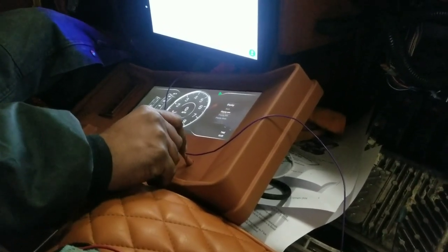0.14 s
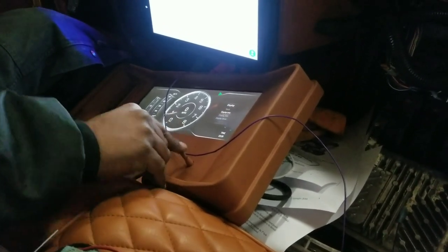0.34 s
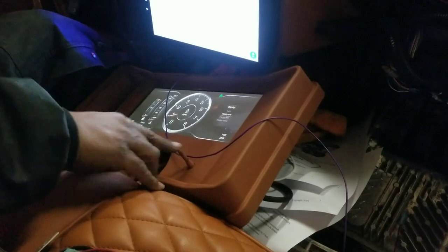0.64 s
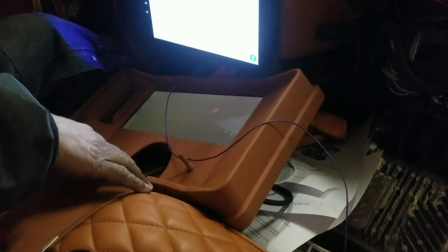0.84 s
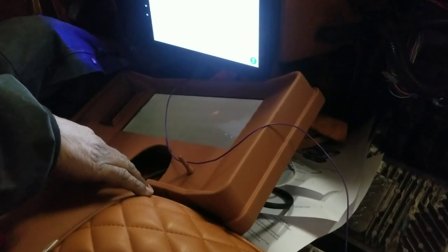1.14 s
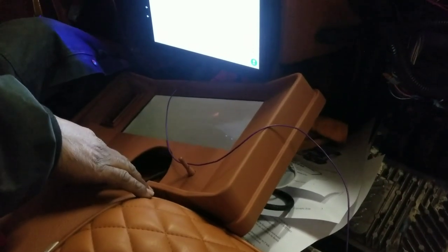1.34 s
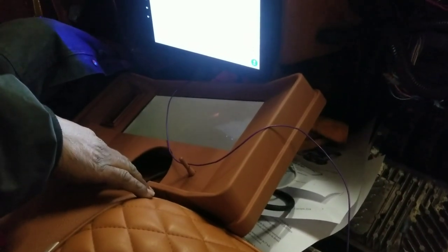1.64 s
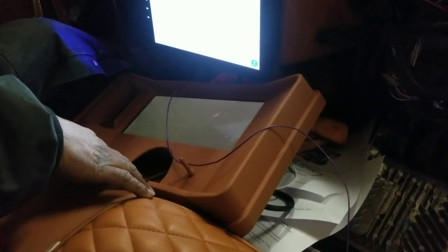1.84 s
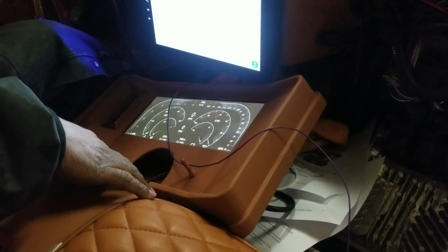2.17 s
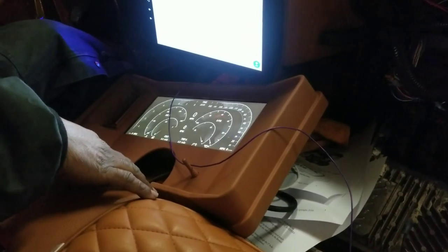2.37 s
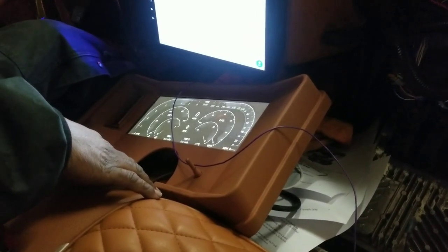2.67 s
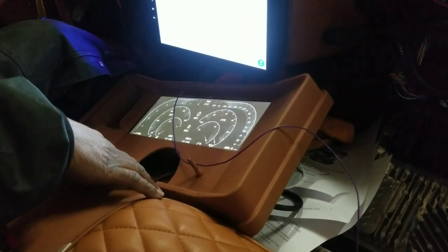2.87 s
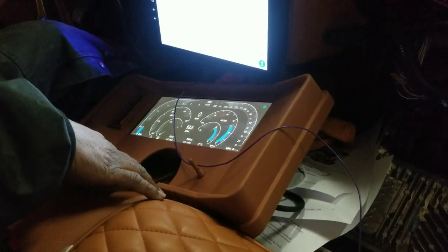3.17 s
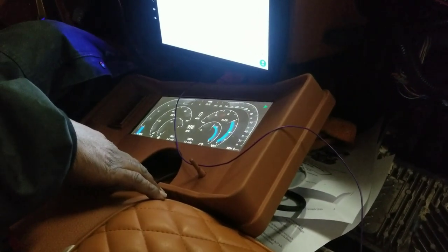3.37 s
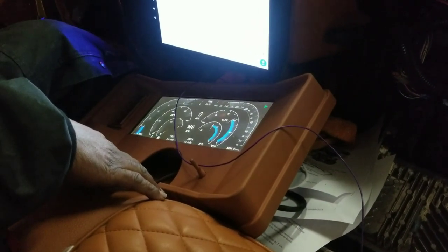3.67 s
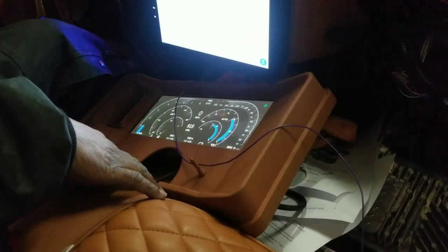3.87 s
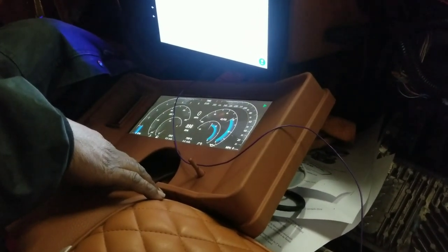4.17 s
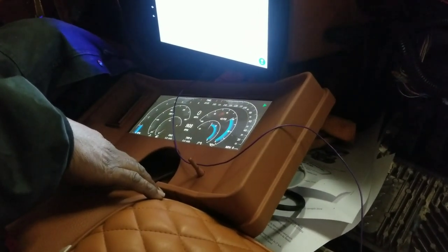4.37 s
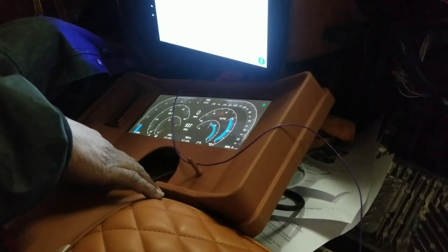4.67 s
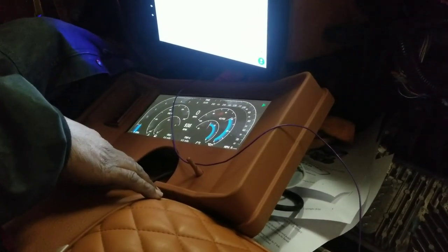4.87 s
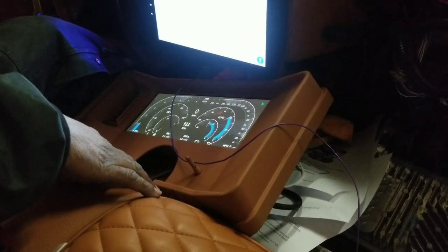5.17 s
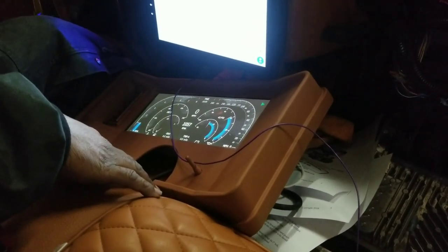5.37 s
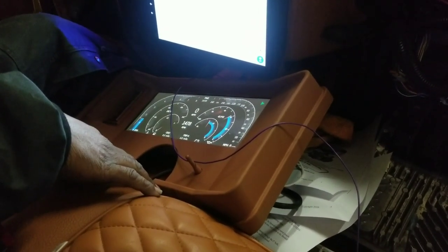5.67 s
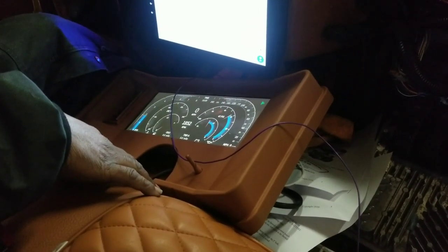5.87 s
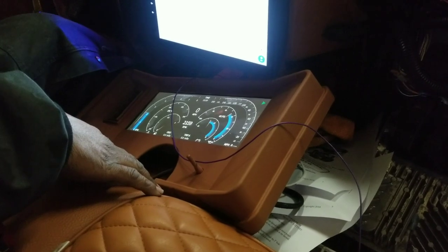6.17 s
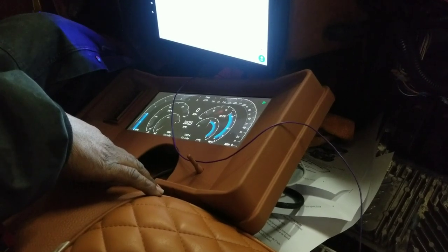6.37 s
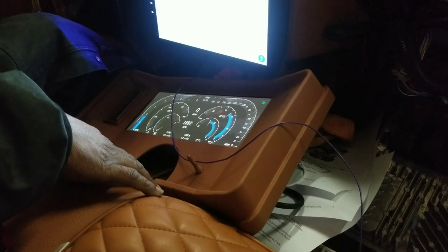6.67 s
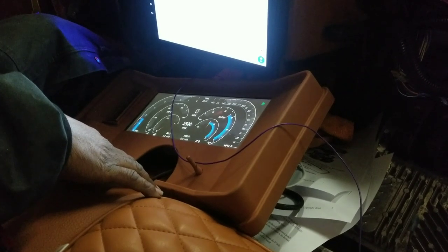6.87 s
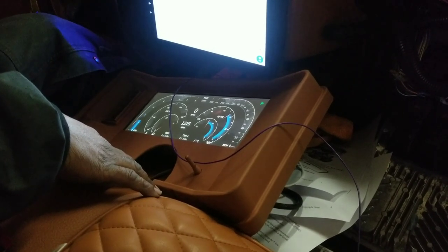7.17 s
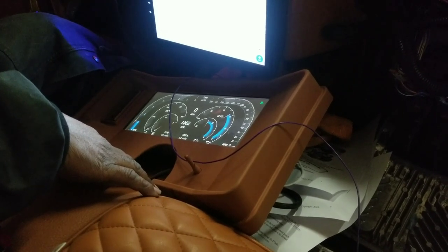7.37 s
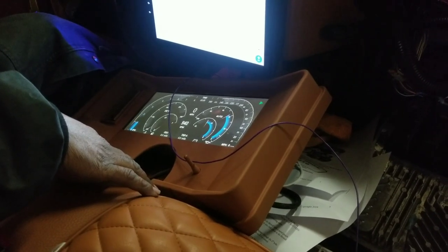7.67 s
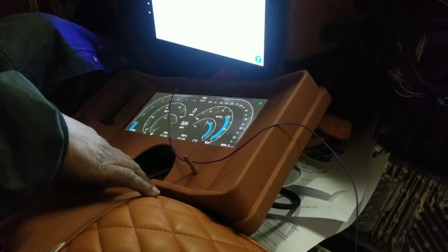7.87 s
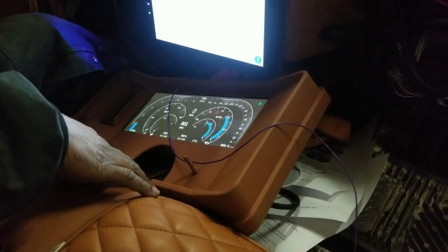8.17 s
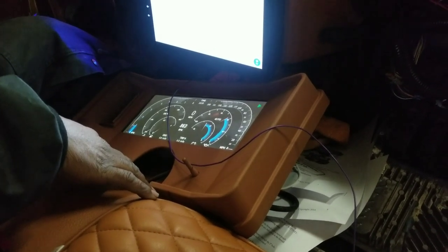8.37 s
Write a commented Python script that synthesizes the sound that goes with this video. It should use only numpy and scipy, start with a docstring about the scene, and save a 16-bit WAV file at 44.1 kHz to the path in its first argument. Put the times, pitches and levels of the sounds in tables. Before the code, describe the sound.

Low, lumpy engine idle throbs in a workshop; a quick throttle stab roars and buzzes loose metal before the revs sink into slow, weak thuds.

```python
"""The deep boom of an eight-cylinder engine idling in a workshop; it is blipped once and sags below idle.
The firings of two uneven banks make harmonics of the engine cycle, shaped by exhaust resonances, and a hum wavers.
Each firing knocks on ringing modes, the hardest also whoops; filtered noise gives the rustle of the valve gear
and the hiss of the intake, strongest on open throttle. A sleeve brushes past in the same hiss; later a loose
shield buzzes as random taps ring its sheet, and near the end a faint pure tone squeaks."""
import sys
import numpy as np
from scipy import signal
from scipy.fft import rfft, irfft, next_fast_len
from scipy.io import wavfile
from scipy.ndimage import uniform_filter1d, minimum_filter1d

SR = 44100
rng = np.random.default_rng(int(sys.argv[2]) if len(sys.argv) > 2 else 0)


def wav_record(signal):
    """Record a signal, one row per channel, as 16-bit PCM in the file named by sys.argv[1]."""
    frames = np.transpose(np.atleast_2d(signal))
    bounded = np.clip(frames, -1, 1)
    # unit amplitude maps onto the largest positive 16-bit level
    quanta = np.round(bounded * 32767).astype(np.int16)
    wavfile.write(sys.argv[1], SR, quanta)


N = 375732  # samples

# Engine speed. Each row: time in seconds, engine cycles per second (one cycle is eight firings).
SPEED = [(0.0, 9.017), (1.2, 8.904), (1.9, 9.03), (2.5, 8.958), (3.2, 8.764), (3.9, 8.865), (4.95, 8.882),
         (5.04, 9.683), (5.16, 12.894), (5.4, 18.119), (5.55, 22.539), (5.76, 23.108), (6.05, 19.579),
         (6.2, 19.101), (6.4, 16.005), (6.56, 14.9), (6.7, 12.5), (6.87, 11.7), (7.0, 10.4), (7.3, 9.005),
         (7.75, 7.876), (8.52, 6.771)]
IDLE_HZ, FIRST_TURN = 8.95, .105  # cycle rate at idle; part of a cycle already run at the start
# Engine load. Each row: time in seconds, manifold knock in dB, treble in dB over idle, weaker orders in dB.
LOAD = [(0, -26, 2, -16.5), (1, -27, 0.34, -16.5), (2.7, -28, -0.05, -17.5), (4.8, -26.5, 0.4, -18),
        (5.05, -23, 3.4, -12.5), (5.2, -24, 4.5, -18), (5.5, -21, 5.5, -16), (5.67, -17, 9.5, -22),
        (5.8, -27, 2.5, -28), (5.98, -17, 1, -11.5), (6.25, -25, -2, -18), (6.5, -23, -4, -13),
        (6.62, -32, -4, -19.5), (7.05, -43.5, -6.5, -38), (7.5, -38.5, -5.5, -31), (7.75, -37, -5, -23),
        (8.0, -37, -3.5, -29.5), (8.28, -34, -1, -28), (8.42, -32.5, -2.5, -18), (8.52, -34, -1, -21)]
# Push of the exhaust. Each row: time in seconds, level in dB over idle.
PUSH = [(0, 0), (1, -1.5), (2.7, -2), (4.85, -2.5), (5.05, 6), (5.2, 0), (5.45, 8), (5.67, 11), (5.8, 6),
        (5.98, 4), (6.3, 0), (6.5, 2.5), (6.62, -14), (6.72, 1), (6.86, 1), (6.98, -11), (7.5, -10.5),
        (8.0, -.5), (8.25, -2.5), (8.52, -.5)]
# Throttle stabs. Each row: opens at s, starts to shut at s, depth 0-1.
THROTTLE = [(4.967, 5.106, 1), (5.15, 5.613, 0.84)]
OPENING_S, SHUTTING_S = 0.03, .11

# Which of the two pipes each of the eight firings leaves by (0 or 1).
BANK = np.array([1, 0, 1, 1, 0, 1, 0, 0])
# Relative strength of the knock of each of the eight firings in dB.
CYLINDER_DB = [0.5, -1, -6.5, -1, -13, -0.5, -5.5, -5]
# Strong clean orders. Each row: multiple of the cycle rate, dB at idle, dB more per octave of speed,
# dB more on open throttle.
STRONG_ORDERS = [(3, -20, -12.3, -19), (4, -32, -6, -2), (5, -39.5, 5, -0.5), (8, -26, -9.5, 6),
                 (9, -50, 19, -9.5), (11, -33.5, 11, 2), (13, -32.5, 11.5, 4.5)]
# Weaker orders. Each row: multiple of the cycle rate, relative level at idle in dB.
WEAK_ORDERS = [(6, -12), (7, -17.5), (10, -10.5), (12, -19), (14, -8), (15, -4.5), (16, -2.5), (17, -10),
               (18, -29.5), (19, -4.5), (20, -26), (21, 3.5), (22, -50), (23, -43), (24, -7.5), (25, -22.5),
               (26, -13)]
SMEAR = .37  # the pipes spread each pulse in time: radians per order squared
# How well the tailpipe carries a strong order. Each row: frequency in Hz, gain in dB.
PIPE = [(25, -31.5), (45, -3.5), (55, 12.5), (63, 0), (72, 8.4), (86, 5.7), (96, 14), (106, 12), (115, 12),
        (128, 7.6), (143, 8), (160, .5), (180, 9), (200, -8), (300, -32)]
# Exhaust and cabin resonances. Each row: frequency in Hz, width in Hz, relative level in dB.
BOOM = [(58.4, 4.6, -5.5), (105.4, 6.9, -4), (119.3, 5.4, -12.5), (131, 5.1, 1), (141.4, 21, -2.5),
        (179.2, 15.7, -3.5), (184.7, 7.5, 1.5), (226, 10.4, -8)]
# A control rule holds: dB at idle, share of the control, dB more on open throttle, dB per octave of speed.
# Rule for the uneven firings; the control is the push.
UNEVEN_RULE = (-23.5, .45, 6.5, -2)
# Narrow wavering hum. Each row: time in seconds, frequency in Hz, level in dB rms.
DRONE = [(0, 135.3, -16), (2.6, 135.3, -27), (3.1, 132.5, -16.5), (3.6, 133.1, -21), (4.7, 132.5, -22.5),
         (5.1, 129.8, -13.5), (5.6, 129.6, -20), (6.2, 129.6, -20.5), (6.5, 131, -62), (6.9, 130.8, -25),
         (7.3, 129.6, -25), (7.55, 126.3, -46), (8.0, 129, -17.5), (8.25, 130.1, -38), (8.52, 135.2, -14)]
# Modes of manifold and floor pan. Each row: frequency in Hz, relative level in dB, t60 in seconds.
PAN = [(222, -1.5, 0.061), (276.1, 1.5, 0.16), (288.5, 0, 0.083), (360.6, -2.5, 0.21), (414.2, -3.5, 0.12),
       (441.2, -7, 0.3), (494.3, -4.5, 0.23), (557.7, -3, 0.14), (728.5, -21, 0.15), (836.7, -18, 0.16),
       (920, -14, 0.1), (1100, -27, 0.029)]
# Whoop of the hardest firing in the header. Each row: time in seconds, strength of the blow in dB.
WHOOP = [(0, -7.5), (2.4, -8.5), (3.2, -10.5), (4.8, -11.5), (5.0, -17), (5.3, -36), (7.6, -41), (8.5, -30)]

# Spectrum of the valve gear. Each row: frequency in Hz, relative density in dB per Hz.
GEAR = [(120, -45), (200, -17), (216, -35), (281, -14), (318, -10.5), (446, -13.5), (571, -15), (627, -20),
        (908, -22), (1360, -24.5), (4120, -30), (6650, -39.5), (8000, -103), (10400, -91), (17600, -120)]
# Spectrum of intake and sleeve. Each row: frequency in Hz, relative density in dB per Hz.
HISS = [(2350, -9.5), (4000, -3), (4970, -4), (6630, 3), (7870, -6), (8440, -8.5), (9630, -3), (13600, 0.5),
        (15100, 3.5), (15800, -44.5)]
# Control rule for the valve gear; the control is the treble level.
GEAR_RULE = (-33, 1.12, 0.2, -0.1)
# Control rule for the intake; the control is the treble level.
INTAKE_RULE = (-48.5, 0.92, 11.5, 0.7)
# Left-right likeness of the noise. Each row: frequency in Hz, correlation from -1 to 1.
SAME = [(60, 0.98), (130, -0.067), (290, 0.91), (640, 0.27), (1410, -0.34), (3100, 0.074), (6820, -0.091),
        (15000, 0.036)]
# A sleeve brushes past. Each row: loudest at s, level in dB, rise in seconds, fall in seconds.
RUSTLE = [(.4, -56, .03, .04), (.7, -52, .04, 0.091)]
# Bursts of a loose heat shield. Each row: loudest at s, level in dB, rise in seconds, fall in seconds.
RATTLE = [(5.214, -25.5, 0.045, 0.028), (5.32, -32, .04, .05), (5.46, -26, 0.066, 0.082),
          (5.65, -13.5, 0.046, 0.048), (5.92, -28, 0.073, 0.17), (6.09, -36, 0.06, 0.048),
          (6.22, -41, 0.0089, 0.014), (6.4, -39, 0.048, .04), (6.52, -28, 0.008, 0.033)]
# Resonances of the shield. Each row: frequency in Hz, width in Hz, relative level in dB.
SHIELD = [(744, 64, 6.5), (900, 170, 9), (1115, 24, 9), (1630, 310, 0), (2000, 61, 1), (2320, 58, -3),
          (2930, 120, -16), (3510, 250, -32)]
SHIELD_REST_DB = -54  # between bursts
# A faint squeak. Each row: loudest at s, level in dB rms, rise in seconds, fall in seconds.
SQUEAK = [(8.39, -49, .07, .035)]
SQUEAK_HZ = 2040

BOOM_LAG, KNOCK_LAG = 20, 12  # samples by which the left port hears late
# Balance of the ports. Each row: frequency in Hz, left over right in dB.
BALANCE_DB = [(60, 2), (250, 2), (600, 2), (1300, 0.6), (2400, -4), (4400, -1.5), (9000, 0.3)]
CEILING, EDGE_HZ = .95, 15800  # limiter ceiling (full scale is 1); upper band edge


def gain_of(db):
    """Decibel law: 20 dB is a tenfold amplitude."""
    return 10 ** (np.asarray(db) / 20)


def evened(x):
    """Normalisation to an rms of 1."""
    return x / np.sqrt(np.mean(x ** 2) + 1e-20)


def read(points, hz):
    """Interpolation of a table along logarithmic frequency."""
    f, value = np.transpose(points)
    return np.interp(np.log(hz + 1), np.log(f + 1), value)


def curve(rows, column):
    """Linear interpolation of one table column over time."""
    rows = np.array(rows)
    return np.interp(np.arange(N) / SR, rows[:, 0], rows[:, column])


def drift(seconds, count):
    """Slow random modulation: straight lines between normal random knots, a set time apart."""
    knots = rng.standard_normal((count, 400))
    knot_time = np.arange(N) / SR / seconds
    return np.array([np.interp(knot_time, np.arange(400), k) for k in knots])


def filtered(x, response):
    """Linear filtering: the spectrum is multiplied by a frequency response."""
    size = next_fast_len(N + SR)
    hz = np.fft.rfftfreq(size, 1 / SR)
    return irfft(rfft(x, size) * response(hz), size)[..., :N]


def resonances(rows, hz):
    """Superposition of damped resonances, each a complex peak of given width."""
    return sum(gain_of(db) / (1 + 2j * (hz - f) / width) for f, width, db in rows)


def bursts(rows):
    """Exponential growth to a peak and exponential decay after it, as a gain."""
    t = np.arange(N) / SR
    return sum(gain_of(db) * np.exp(-np.maximum((s - t) / rise, (t - s) / fall)) for s, db, rise, fall in rows)


def throttle():
    """Valve opening 0-1: each stab ramps open and ramps shut."""
    t = np.arange(N) / SR
    return np.maximum(*[np.interp(t, [a, a + OPENING_S, b, b + SHUTTING_S], [0, depth, depth, 0])
                        for a, b, depth in THROTTLE])


def follow(rule, control_db):
    """Level in dB as a sum of the effects of control, throttle and speed."""
    idle_db, share, open_db, slope_db = rule
    octaves = np.log2(curve(SPEED, 1) / IDLE_HZ)
    return idle_db + share * control_db + open_db * throttle() + slope_db * octaves


def firings(turns):
    """Eight equal divisions of the cycle: sample and cylinder of every firing."""
    count = np.floor(8 * turns)
    at = np.flatnonzero(np.diff(count)) + 1
    return at, count[at].astype(int) % 8


def boom(hz):
    """Exhaust resonances within a band: little passes far below or above them."""
    return resonances(BOOM, hz) / (1 + (44 / (hz + 1e-9)) ** 4) / (1 + (hz / 400) ** 2)


def pipe(hz):
    """Minimum-phase response of the tailpipe: its peaks ring on after an order has passed through them."""
    log_gain = np.log(gain_of(read(PIPE, hz)))
    circle = signal.hilbert(np.r_[log_gain, log_gain[-2:0:-1]])
    return np.exp(np.conj(circle[:len(hz)]))


def order_tone(k, turns, chance):
    """Fourier harmonic of the cycle, its phase set by the uneven firing of the banks."""
    phases = np.angle(np.fft.fft(BANK + 0.21 * gain_of(CYLINDER_DB)))
    return np.cos(2 * np.pi * k * turns + phases[k % 8] + SMEAR * k * k + chance)


def exhaust(turns):
    """Harmonics through resonances: strong orders follow the push, weak ones their own level."""
    push_db = curve(PUSH, 1)
    strong = np.zeros(N)
    for (k, db, slope_db, open_db), chance in zip(STRONG_ORDERS, drift(0.22, count=len(STRONG_ORDERS))):
        level_db = follow((db, 1, open_db, slope_db), push_db)
        strong += np.sqrt(2) * gain_of(level_db) * order_tone(round(k), turns, 0.3 * chance)
    weak = np.zeros(N)
    for (k, db), chance in zip(WEAK_ORDERS, drift(.15, count=len(WEAK_ORDERS))):
        idle_response = abs(boom(max(k * IDLE_HZ, 60)))  # divided out, so the table holds at idle
        weak += gain_of(db + 1.0 * chance) / idle_response * order_tone(round(k), turns, 0.37 * chance)
    weak = filtered(weak, boom)
    weak /= np.std(weak[:4 * SR])  # the first four seconds, at idle, set the reference
    return filtered(strong, pipe) + weak * gain_of(curve(LOAD, 3))


def rumble(turns):
    """Impulse excitation: no two firings burn alike, and the differences ring the boom resonances."""
    at, _ = firings(turns)
    kicks = np.zeros(N)
    kicks[at] = rng.uniform(-1.2, 1, len(at))
    return evened(filtered(kicks, boom)) * gain_of(follow(UNEVEN_RULE, curve(PUSH, 1)))


def drone():
    """Frequency modulation: a narrow hum wavers about a pitch independent of engine speed."""
    wavering_hz = curve(DRONE, 1) + 1.43 * drift(0.048, count=1)[0]
    cycles = np.cumsum(wavering_hz) / SR
    return np.sqrt(2) * gain_of(curve(DRONE, 2)) * np.sin(2 * np.pi * cycles)


def knock(turns):
    """Modal ringing: each firing strikes the manifold, more raggedly the faster the engine runs."""
    at, cylinder = firings(turns)
    timing_luck, size_luck = rng.standard_normal((2, len(at)))
    ragged = (curve(SPEED, 1)[at] / IDLE_HZ) ** 1.43
    blows = np.zeros(N + 400)
    # a lead-in of 200 samples, cut off below, lets blows come early as well as late
    shift = np.clip(200 + 12 * ragged * timing_luck, 0, 399).astype(int)
    size_db = np.array(CYLINDER_DB)[cylinder] + 1.53 * ragged * size_luck
    blows[at + shift] = gain_of(size_db) * (2 * BANK[cylinder] - 1)  # the banks push in opposite senses
    t = np.arange(SR // 4) / SR
    ring = sum(gain_of(db - 60 * t / t60) * np.sin(2 * np.pi * hz * t) for hz, db, t60 in PAN)
    soft_onset = 1 - np.exp(-t / 0.0038)
    out = signal.oaconvolve(blows[200:], ring * soft_onset)[:N]
    running_rms = np.sqrt(uniform_filter1d(out ** 2, SR // 2) + 1e-12)
    return out / running_rms * gain_of(curve(LOAD, 1))


def whoop(turns):
    """Gliding resonance: once a cycle a short tone rises in pitch over a duller thud."""
    at, cylinder = firings(turns)
    at = at[cylinder == 0]
    blows = np.zeros(N)
    blows[at] = gain_of(curve(WHOOP, 1)[at] + 1.0 * rng.standard_normal(len(at)))
    t = np.arange(SR // 10) / SR
    rise_hz = 520 - 170 * np.exp(-t / .014)
    tone = np.sin(2 * np.pi * np.cumsum(rise_hz) / SR) * (1 - np.exp(-t / .004)) * gain_of(-60 * t / .075)
    thud = gain_of(-5.5 - 60 * t / 0.08) * np.sin(2 * np.pi * 335 * t) * (1 - np.exp(-t / 0.0057))
    return signal.oaconvolve(blows, tone + thud)[:N]


def noise(spectrum, level_db, patchy_db, flicker_db):
    """Partly coherent stereo noise, with drifting patches and a flicker shared by all pitches."""
    level_db = level_db[::128]  # one value per frame
    frames, hz = len(level_db), np.fft.rfftfreq(512, 1 / SR)
    a, b, c, d, patches = rng.standard_normal((frames, 257, 5)).T
    patches = evened(uniform_filter1d(uniform_filter1d(patches, 8, 0), 20, 1))
    flicker = evened(uniform_filter1d(rng.standard_normal(frames), 5))
    same = np.clip(read(SAME, hz), -1, 1)[:, None]
    left, other = a + 1j * b, c + 1j * d
    z = np.array([left, same * left + np.sqrt(1 - same ** 2) * other])
    z *= gain_of(read(spectrum, hz)[:, None] + patchy_db * patches + flicker_db * flicker)
    scale = np.std(signal.istft(z, nperseg=512, noverlap=384)[1])
    out = signal.istft(z * gain_of(level_db), nperseg=512, noverlap=384)[1] / scale
    return np.pad(out, ((0, 0), (0, 512)))[:, :N]


def valve_gear():
    """Broadband friction noise: the rustle follows the treble level and the speed."""
    return noise(GEAR, follow(GEAR_RULE, curve(LOAD, 2)), patchy_db=1.0, flicker_db=0.44)


def intake_and_sleeve():
    """Turbulent noise: the intake hisses with open throttle, and the brushing sleeve hisses alike."""
    level = gain_of(follow(INTAKE_RULE, curve(LOAD, 2))) + bursts(RUSTLE)
    return noise(HISS, 20 * np.log10(level), patchy_db=.8, flicker_db=.25)


def shop(x, t60=0.24):
    """Reverberation: sparse echoes of random sign, other ones for each side."""
    taps = np.zeros((2, SR // 2))
    slots = np.arange(200, SR // 2 - 20, 20)
    at = slots + rng.integers(0, 20, (2, len(slots)))
    np.put_along_axis(taps, at, rng.choice([-1., 1.], at.shape), 1)
    taps *= gain_of(-60 * np.arange(SR // 2) / SR / t60)
    return signal.fftconvolve(x[None], taps / np.linalg.norm(taps[0]), axes=1)[:, :N]


def shield():
    """Plate resonance: dense random taps ring the thin sheet, other taps for each side."""
    taps = rng.standard_normal((2, N)) * (rng.random((2, N)) < 1500 / SR)  # 1500 a second on average
    ring = filtered(taps, lambda hz: resonances(SHIELD, hz) / (1 + (hz / 5000) ** 4))
    return evened(ring) * (gain_of(SHIELD_REST_DB) + bursts(RATTLE))


def squeak():
    """Pure tone: a thin sine of steady pitch swells and dies."""
    return np.sqrt(2) * bursts(SQUEAK) * np.sin(2 * np.pi * SQUEAK_HZ * np.arange(N) / SR)


def late(x, count):
    """Propagation delay by a number of samples."""
    return np.pad(x, (count, 0))[:N]


def scene():
    """Superposition of all sources, with the engine heard late at the left port."""
    turns = FIRST_TURN + np.cumsum(curve(SPEED, 1)) / SR
    bass = exhaust(turns) + rumble(turns) + drone()
    blows = knock(turns) + whoop(turns)
    left = late(bass, count=BOOM_LAG) + late(blows, count=KNOCK_LAG)
    near = np.array([left, bass + blows])
    echoes = gain_of(-10.0) * shop(blows) + gain_of(-22) * shop(bass)
    return near + echoes + valve_gear() + intake_and_sleeve() + shield() + squeak()


def record(dry):
    """Reception: two microphone ports differ in colour; a limiter holds the peaks; then the band limit."""
    halves = np.array([[.5], [-.5]])  # each port takes half the balance
    ports = filtered(dry, lambda hz: gain_of(halves * read(BALANCE_DB, hz)))
    allowed = np.minimum(1, CEILING / (abs(ports).max(0) + 1e-9))
    allowed = minimum_filter1d(allowed, size=1001)
    held = ports * uniform_filter1d(uniform_filter1d(allowed, size=500), size=500)
    band_limit = signal.firwin(1023, EDGE_HZ, window=("kaiser", 9), fs=SR)
    return signal.oaconvolve(held, band_limit[None], "same")


dry = scene()
out = record(dry)
wav_record(out)
```